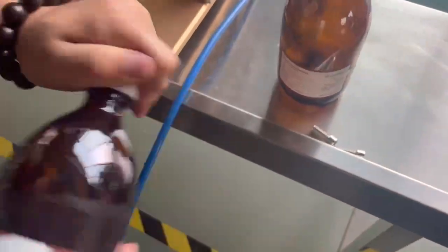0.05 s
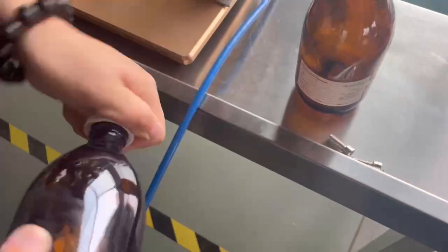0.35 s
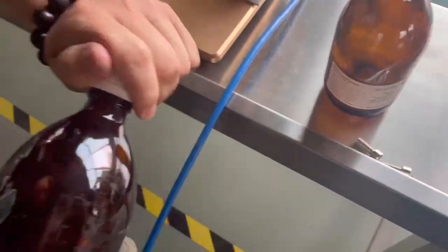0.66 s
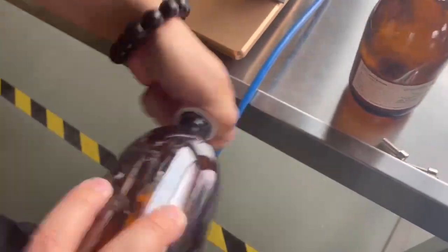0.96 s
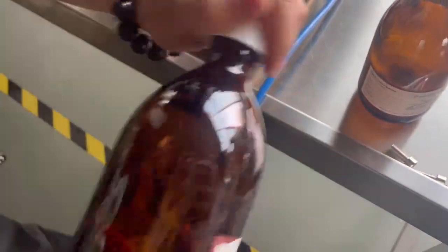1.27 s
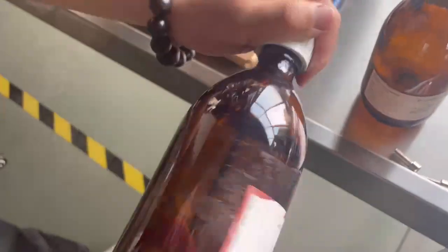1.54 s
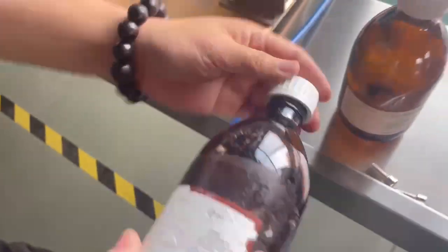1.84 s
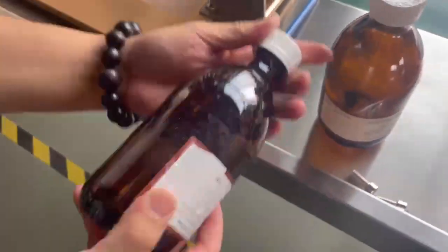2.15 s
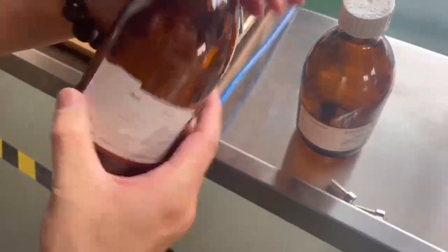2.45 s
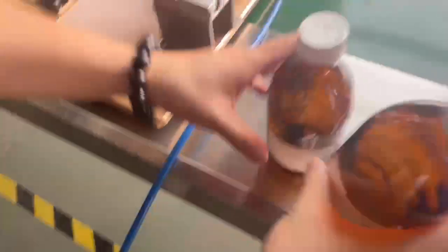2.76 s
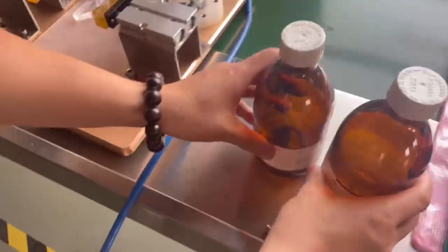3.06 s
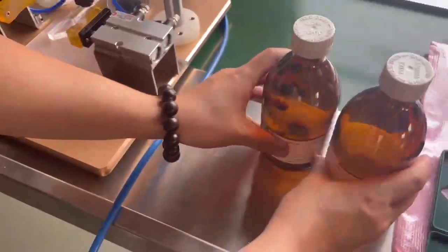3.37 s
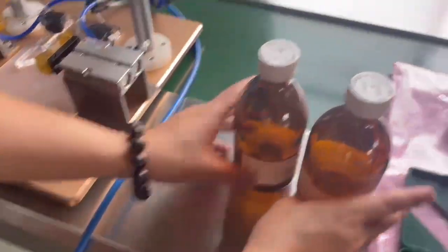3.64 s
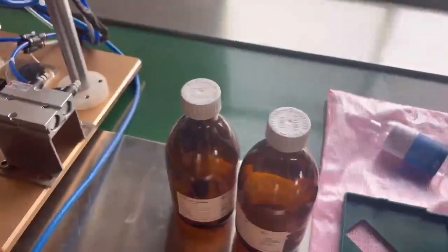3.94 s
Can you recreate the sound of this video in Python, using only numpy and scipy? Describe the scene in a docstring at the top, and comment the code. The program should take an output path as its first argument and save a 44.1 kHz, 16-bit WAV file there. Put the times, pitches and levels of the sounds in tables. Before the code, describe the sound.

A plastic bottle cap clicks as it is twisted tight, over humming workshop machinery.

```python
"""Capping a bottle in a workshop

Machinery hums, throbs and whines while a plastic cap is screwed onto a bottle close by.
The cap rubs and clicks as it sticks and slips in its thread, then snaps tight.
The bottle is set on a steel bench, whose top booms and rattles at every contact.
An air hiss and the whine come forward as the microphone moves over the bench."""
import sys
import numpy as np
from scipy import signal
from scipy.fft import rfft, irfft
from scipy.io import wavfile

SR = 44100
rng = np.random.default_rng(int(sys.argv[2]) if len(sys.argv) > 2 else 0)


def bounce(signal):
    """Save signal as a 16-bit WAV file at the path given by the first command-line argument."""
    frames = np.transpose(np.atleast_2d(signal))
    limited = np.clip(frames, -1, 1)
    pcm = np.round(limited * 32767).astype(np.int16)
    wavfile.write(sys.argv[1], SR, pcm)


N = 176400
T = np.arange(N) / SR
SIDES = np.array([[1], [-1]])  # adds on the left, subtracts on the right
WIDE_ABOVE_HZ = 680  # bursts, rubs and the bench narrow towards mono below this


def undb(db):
    """Decibels to gain."""
    return 10 ** (np.asarray(db) / 20)


def unit(x):
    """Scale to rms 1."""
    return x / np.sqrt(np.mean(x ** 2))


def colour(x, curve):
    """EQ through (freq_hz, gain_db) points."""
    hz, db = np.array(curve, float).T
    freqs = np.maximum(np.fft.rfftfreq(x.shape[-1], 1 / SR), 1)
    return irfft(rfft(x) * undb(np.interp(np.log(freqs), np.log(hz), db)), x.shape[-1])


def noise(curve):
    """Coloured noise of rms 1."""
    return unit(colour(rng.standard_normal(N), curve))


def band(hz, width_hz):
    """Noise in one steep resonance, rms 1; centred on 0 Hz it is a random wobble."""
    detune = (np.fft.rfftfreq(N, 1 / SR) - hz) / width_hz * 2
    return unit(irfft(rfft(rng.standard_normal(N)) / (1 + detune ** 2), N))


def tone(hz):
    """Sine of rms 1."""
    return np.sqrt(2) * np.sin(2 * np.pi * hz * T)


def ride(points):
    """Fader ride in dB through (time_s, level_db) points."""
    return np.interp(T, *np.array(points).T)


def attack(t, rise_s):
    """Linear fade-in."""
    return np.minimum(t / rise_s, 1)


def decay(t, t60_s):
    """Exponential fall, 60 dB in t60_s."""
    return np.exp(-np.log(1000) * t / t60_s)


def pan(db):
    """Left and right gains, the left louder by db."""
    return undb(SIDES * db / 2)


def add(out, start_s, x):
    """Mix a sound in at its time."""
    i = int(start_s * SR)
    n = min(x.shape[-1], N - i)
    out[..., i:i + n] += x[..., :n]


def stereo(pair, curve, spread):
    """Colour two signals and use them as mid and side, with the bass near the centre."""
    mid, side = unit(colour(pair, curve))
    side = colour(side, [(WIDE_ABOVE_HZ / 10, -20), (WIDE_ABOVE_HZ, 0)])
    return mid + spread * SIDES * side


def burst(curve, t60_s, spread, size=SR):
    """A decaying stereo burst of coloured noise."""
    return stereo(rng.standard_normal((2, size)), curve, spread) * decay(T[:size], t60_s)


def friction(strokes, curve, ticks_per_s=2200):
    """Arched strokes of dense ticks, uneven in time and size like stick-slip."""
    ticks = (rng.random(N) < ticks_per_s / SR) * rng.uniform(-1.05, 1, (2, N))
    effort = np.zeros(N)
    for start_s, length_s, db in strokes:
        position = 2 * (T - start_s) / length_s - 1
        effort += undb(db) * np.sqrt(np.maximum(1 - position ** 2, 0))
    return effort * stereo(ticks, curve, spread=.5)


def room(direct):
    """Add diffuse workshop reflections, duller than the direct sound."""
    tail = burst([(100, -1), (2000, -8), (6000, -11), (14000, -18)], t60_s=.79, spread=.61)
    reflections = signal.fftconvolve(direct, unit(tail) / np.sqrt(SR), axes=1)[:, :N]
    return direct + undb(-18) * reflections


# Fan air in the centre, with a deep notch filtered out at 8 kHz: freq_hz, gain_db
FAN_EQ = [(20,-30),(32,-19),(48,6),(100,6),(200,-0.5),(240,-2.5),(330,-1),(430,0.5),(480,-1),(600,-3),(750,-5),(1130,-12.5),(1260,-1),(1500,-7),(1900,-12.5),(2200,-9),(3000,-14),(3600,-7.5),(4100,-3.5),(4450,-10),(4800,-8),(5050,-17),(5500,-7.5),(6300,-14),(7300,-14.5),(8000,-44.5),(9500,-23.5),(11000,-33),(13000,-42),(15500,-74)]
# The air's diffuse part, in opposite polarity left and right: freq_hz, gain_db
DIFFUSE_EQ = [(20,-24),(60,-0.5),(150,-8),(330,3.5),(450,-1),(570,6),(750,-7),(1100,-2.5),(1280,-7),(1600,2.5),(2200,-4.5),(2900,-6),(3400,-4.5),(4700,-11.5),(5100,-5.5),(5800,-10),(6600,-7.5),(9000,-7),(10500,-40),(15500,-28.5)]
def fan_air():
    """The rush of the fan, split into body and treble at 2800 Hz."""
    air = undb(-36.5) * noise(FAN_EQ) + undb(-41.5) * SIDES * noise(DIFFUSE_EQ)
    body = signal.sosfiltfilt(signal.butter(2, 2800, fs=SR, output="sos"), air)
    return body, air - body


# Ride on the fan's treble: time_s, level_db
TREBLE_RIDE = [(0,0),(.7,1),(1.7,1.5),(1.9,0.2),(2.45,0.5),(2.8,2.5),(3.3,1.6),(4,2.1)]
def fan_flutter(treble, turn, chatter_hz=36.3):
    """The fan's treble swells with every turn of the machine, chatters and flickers."""
    chatter = unit(band(chatter_hz, 10) + band(2 * chatter_hz, 14) + .5 * band(4 * chatter_hz, 60))
    flicker = band(0, 86)
    return treble * undb(1.43 * turn + 1.1 * chatter + 2.5 * flicker + ride(TREBLE_RIDE))


# Motor hum partials: pitch_hz, level_db
HUM_PARTIALS = [(100,-55),(122,-51),(299.8,-47),(400,-50.5)]
def motor_hum(trim_db=-1):
    """Low motor tones, each wavering against a sliver of noise."""
    return sum(undb(trim_db + db) * unit(tone(hz) + .87 * band(hz, 8.7)) for hz, db in HUM_PARTIALS)


# Casing resonances: pitch_hz, width_hz, level_db
CASING_BANDS = [(319,18,-53),(544,34,-48.5),(1246,28,-46),(1295,70,-47.5),(1385,130,-52),(1771,22,-59),(1906,20,-59),(2282,18,-58),(2490,26,-58.5),(3313,22,-54.5),(3505,22,-57),(3704,16,-54.5),(4631,30,-56),(4743,60,-52),(4850,40,-56)]
# Ride on the casing, weaker once the microphone is over the bench: time_s, level_db
CASING_RIDE = [(0,0),(.7,0),(1.6,1),(2.2,1),(2.9,0),(3.3,-3),(4,-5.5)]
def casing(turn, trim_db=-.5):
    """The machine's casing resonates and throbs with every turn, its low bands least."""
    out = np.zeros((2, N))
    for hz, width_hz, db in CASING_BANDS:
        throb_db = 2 * min(hz / 1200, 1) ** 2 * turn
        spread = .27 * min(hz / 500, 1)
        resonance = band(hz, width_hz) + spread * SIDES * band(hz, width_hz)
        out += undb(trim_db + db + throb_db + ride(CASING_RIDE)) * resonance
    return out


# Swells of the whine, strongest over the bench: time_s, level_db
WHINE_RIDE = [(0,-57),(.24,-45.5),(.45,-44.5),(.68,-59),(.87,-47),(1.35,-49.5),(1.55,-58),(2.3,-46.5),(2.7,-55.5),(2.97,-42.5),(3.2,-39.5),(3.37,-39),(3.52,-49),(3.66,-42),(3.82,-43.5),(4,-51)]
def whine(pitch_hz=2433):
    """A high machine tone beating against narrow noise at the same pitch."""
    waver = band(pitch_hz, 36) + .5 * SIDES * band(pitch_hz, 18)
    return unit(tone(pitch_hz) + .8 * waver) * undb(ride(WHINE_RIDE))


# Ride on the fan's body, the hum and the casing together: time_s, level_db
BODY_RIDE = [(0,1),(1.5,1),(2.3,0),(3,2.5),(3.5,2),(4,0)]
# Stereo lean of the machinery: freq_hz, left_minus_right_db
MACHINE_LEAN = [(60,-0.5),(150,-0.3),(300,1),(550,5.5),(1000,2),(2000,1.5),(5000,3.5),(8000,-1.5),(15000,1)]
def machinery(turn_hz=7.81, peak_s=.08):
    """Fan, motor, casing and whine, a little to the left; some turns throb harder than others."""
    air, treble = fan_air()
    turn = np.cos(2 * np.pi * turn_hz * (T - peak_s)) * (1 + .87 * band(0, turn_hz))
    treble = fan_flutter(treble, turn)
    flicker_db = 1.15 * band(0, 20)
    body = air * undb(flicker_db) + motor_hum() + casing(turn)
    left, right = body * undb(ride(BODY_RIDE)) + treble + whine()
    return np.array([colour(left, [(hz, db / 2) for hz, db in MACHINE_LEAN]),
                     colour(right, [(hz, -db / 2) for hz, db in MACHINE_LEAN])])


# Thin, bright hiss, with a deep notch filtered out at 8 kHz: freq_hz, gain_db
HISS_EQ = [(1500,-25),(3200,7.5),(4000,12),(5000,7.5),(6500,4.5),(8000,-45),(10000,-0.5),(11500,1.5),(13000,-6),(14500,-39)]
# Swell of the hiss: time_s, level_db
HISS_RIDE = [(0,-67),(2.75,-60),(2.9,-42),(3.05,-39),(3.3,-41.5),(3.48,-62),(4,-71)]
def air_hiss():
    """A flickering hiss of air, heard best over the bench."""
    return noise(HISS_EQ) * undb(ride(HISS_RIDE) + 2.8 * band(0, 30))


# Short treble flicks: start_s, length_s, level_db
FLICK_STROKES = [(1.345,0.017,-39),(1.94,0.013,-37),(2.17,.01,-41),(2.23,.01,-42),(2.62,0.026,-38.5),(2.833,0.01,-39),(3.784,0.015,-31.5),(3.893,.014,-39)]
# Their light, papery colour: freq_hz, gain_db
FLICK_EQ = [(800,-20),(2500,-6),(4000,1),(6000,-2),(8000,-18),(11000,-20),(15000,-34)]
def treble_flicks():
    """Short, papery treble flicks, several on the machine's throb."""
    return friction(FLICK_STROKES, FLICK_EQ)


# Slides of the bottle's base: start_s, length_s, level_db
SLIDE_STROKES = [(3.215,0.05,-30),(3.255,0.075,-35)]
# Their dull scrape: freq_hz, gain_db
SLIDE_EQ = [(40,-23),(120,11),(300,4),(550,3),(1000,2),(1600,-2),(3000,-18),(6000,-31),(12000,-62)]
# Rumbles of the bench frame: start_s, length_s, level_db
RUMBLE_STROKES = [(3.29,.04,-31.5),(3.26,0.35,-39.5)]
# Their low boom: freq_hz, gain_db
RUMBLE_EQ = [(30,-29),(80,-9),(125,11),(180,-10),(400,-11),(900,-34),(3000,-66)]
def bottle_settling():
    """The base slides into place and the bench frame rumbles under it."""
    return friction(SLIDE_STROKES, SLIDE_EQ) + friction(RUMBLE_STROKES, RUMBLE_EQ)


# Modes of the steel top: pitch_hz, level_db, nominal_t60_s
BENCH_MODES = [(80,-36,.7),(124,-33,1.0),(177,-30,.26),(220,-29,.26),(270,-27,.26),(320,-25.5,.42),(355,-28,.35),(385,-27.5,.37),(440,-34,.25),(530,-33,.35),(654,-35,.25),(894,-34,.28),(1006,-34,.28),(1290,-34,.28),(1728,-33,.13),(2400,-30,.12)]
def bench_ring(t, spread, trim_db=-.5, decay_scale=.98):
    """The struck top rings in its modes, the high ones wider in stereo."""
    phases, lags = rng.standard_normal((2, len(BENCH_MODES)))
    out = np.zeros((2, len(t)))
    for (hz, db, t60_s), phase, lag in zip(BENCH_MODES, phases, lags):
        side_phase = spread * min(hz / WIDE_ABOVE_HZ, 1) * SIDES * lag
        mode = np.sin(2 * np.pi * (hz * t + phase) + side_phase)
        out += undb(trim_db + db) * decay(t, t60_s * decay_scale) * mode
    return out


# Contacts of bottle and bench: start_s, level_db, hardness_db
CONTACTS = [(3.1002,-6,8),(3.103,-2,-3),(3.1064,-3,0.5),(3.119,-8,-8),(3.129,-5,-2),(3.148,-11.5,-3),(3.179,-14,-5)]
# Dense wash of the steel sheet: freq_hz, gain_db
SHEET_EQ = [(25,-32),(60,-16),(130,-16),(300,4),(500,6),(900,0),(1600,0),(2500,-16),(4000,-27),(7000,-35),(12000,-59)]
# Knock of the base: freq_hz, gain_db
KNOCK_EQ = [(25,-32),(70,-18),(140,3),(260,19),(600,3),(1500,3),(2700,5.5),(4000,-8),(6500,-2),(8000,-24.5),(12000,-10),(15000,-42)]
def bottle_landing(spread=.55):
    """The bottle knocks on the steel top and rocks; the sheet rings after every contact."""
    out, t = np.zeros((2, N)), T[:SR]
    for start_s, db, hardness_db in CONTACTS:
        ring = bench_ring(t, spread)
        sheet = undb(-27.5) * burst(SHEET_EQ, t60_s=.41, spread=spread)
        knock = undb(-15 + hardness_db) * burst(KNOCK_EQ, t60_s=.051, spread=spread)
        hit = attack(t, rise_s=.0029) * (ring + sheet) + attack(t, rise_s=.0004) * knock
        add(out, start_s, undb(db) * hit)
    return out


# Twists of the cap: start_s, length_s, level_db
TWIST_STROKES = [(.02,0.11,-44),(.28,0.089,-40),(.52,0.1,-37.5),(.8,0.15,-38),(1.07,.11,-34.5)]
# Rasp of the thread: freq_hz, gain_db
THREAD_EQ = [(500,-14),(1200,0),(1700,4),(2700,0.5),(3800,-5),(4900,-5),(6000,-1),(8000,-24),(11000,-15),(15000,-43)]
def thread_rub():
    """The cap rubs in its thread with each twist."""
    return friction(TWIST_STROKES, THREAD_EQ)


def plastic_ring(modes, t):
    """Plastic rings in (pitch_hz, level_db, t60_s) modes, out of step on the two sides."""
    lags = .71 * rng.choice([-1, 1], len(modes))
    phases = 2 * np.pi * rng.random(len(modes))
    return sum(undb(db) * decay(t, t60_s) * np.sin(2 * np.pi * hz * t + phase + SIDES * lag)
               for (hz, db, t60_s), lag, phase in zip(modes, lags, phases))


# Slips of the thread, the loudest snapping the cap tight: start_s, level_db, pitch_hz, crack_db
SLIPS = [(.0308,-21.5,1860,3),(.0635,-28,1450,5),(0.101,-25,1700,0),(.344,-26,2000,-2),(.453,-31,1520,5),(0.4948,-32,1500,5),(0.5295,-21,1640,3),(0.5572,-24,1600,4),(.564,-27,1630,-2),(0.588,-25,1600,-1),(0.8122,-24.5,1460,7),(0.839,-29,1470,4),(0.8652,-24,2630,2),(.8705,-31,2400,6),(.8875,-26,2170,7),(.892,-30,2100,6),(.950,-25,1450,-4),(1.058,-32,2420,6),(1.0884,-23,1500,11),(1.1122,-16.5,1700,5.5),(1.1162,-18,1720,-14),(1.132,-23,1800,1),(1.1405,-7.5,1895,-2.5),(1.174,-24,1780,-2),(1.3532,-24,1395,-4)]
# Modes of the bottle's neck: pitch_ratio, level_db, t60_s
NECK_MODES = [(.76,-14,.02),(1,0,.025),(1.13,-11,.016),(1.55,-12,.011)]
# Short modes of the plastic shell that make the crack: pitch_hz, level_db, t60_s
SHELL_MODES = [(1230,-9,.012),(2700,-3,.011),(3020,-1,.011),(3480,-4,.01),(3950,-7,.009),(5750,-4.5,.009),(6500,-9,.008),(10500,-11,.007)]
# Noisy edge of the crack: freq_hz, gain_db
CRACK_EQ = [(300,-20),(1100,-5),(1800,0),(3100,3),(4000,-1),(4900,-13),(6000,-4),(8000,-15),(12000,-9),(15500,-25)]
def cap_clicks(scatter=.035):
    """Each slip cracks the shell and rings the neck; the grip shifts the modes from slip to slip."""
    out, t = np.zeros((2, N)), T[:4096]
    for start_s, level_db, pitch_hz, crack_db in SLIPS:
        neck = plastic_ring([(pitch_hz * ratio, db, t60_s) for ratio, db, t60_s in NECK_MODES], t)
        shifted = [(hz * (1 + scatter * rng.standard_normal()), db, t60_s)
                   for hz, db, t60_s in SHELL_MODES]
        shell = undb(-2) * plastic_ring(shifted, t)
        edge = undb(-8) * burst(CRACK_EQ, t60_s=.011, spread=.43, size=len(t))
        click = neck + undb(crack_db) * (shell + edge)
        add(out, start_s, undb(level_db) * attack(t, rise_s=.0005) * click)
    return out


def scene():
    """Bottle handling, with room reflections, in front of the running machines."""
    background = machinery() + air_hiss()
    close = (cap_clicks() + thread_rub() + treble_flicks()) * pan(db=3)
    bench = (bottle_settling() + bottle_landing()) * pan(db=1)
    return background + room(close + bench)


def record(dry, top_hz=15750):
    """A steep low-pass cuts the very top."""
    return signal.sosfilt(signal.ellip(10, .1, 80, top_hz, fs=SR, output="sos"), dry)


dry = scene()
out = record(dry)
bounce(out)
```